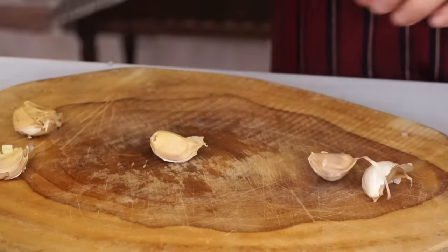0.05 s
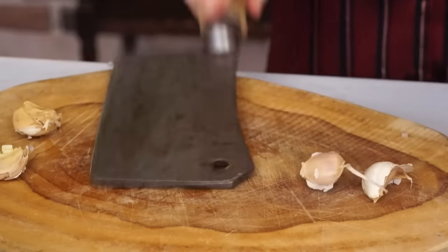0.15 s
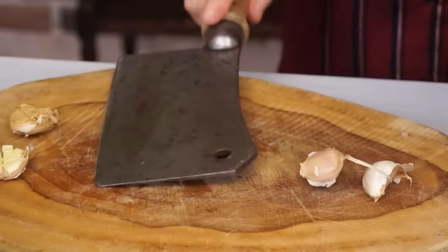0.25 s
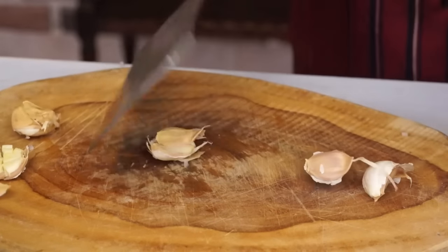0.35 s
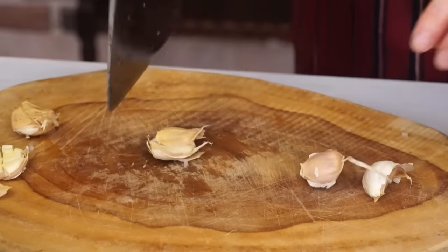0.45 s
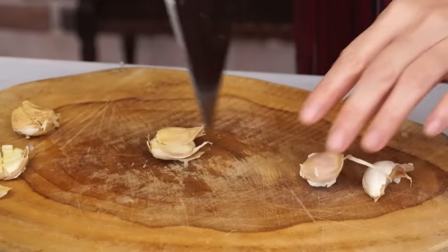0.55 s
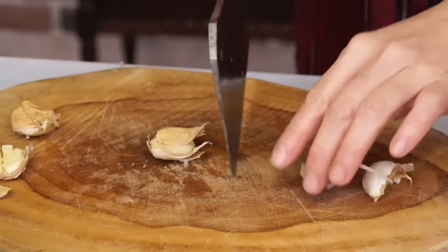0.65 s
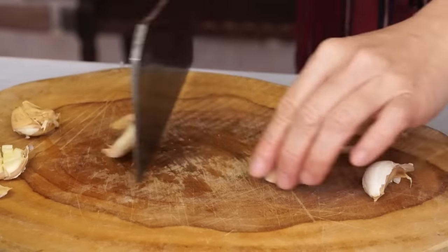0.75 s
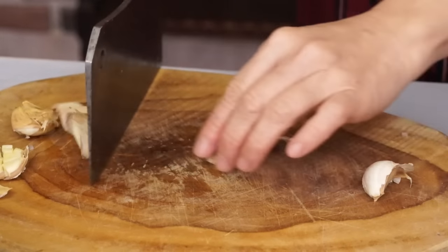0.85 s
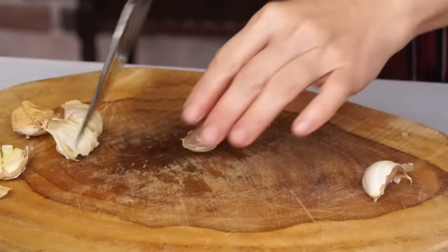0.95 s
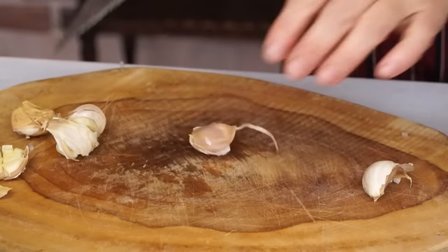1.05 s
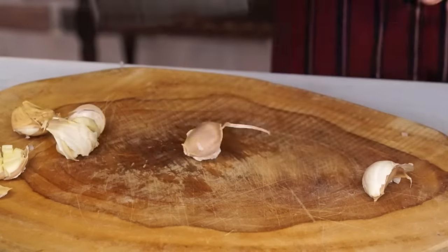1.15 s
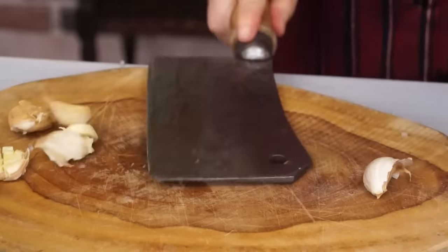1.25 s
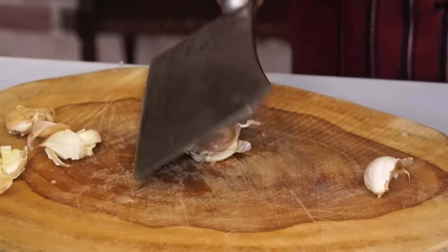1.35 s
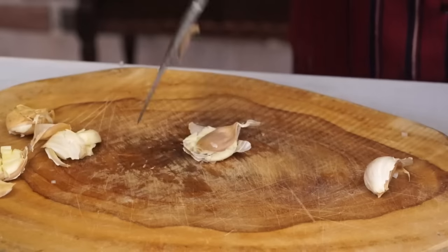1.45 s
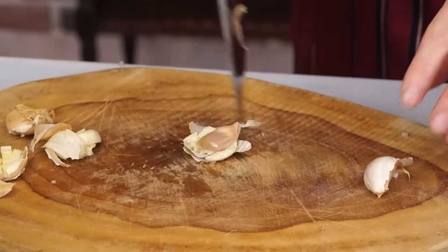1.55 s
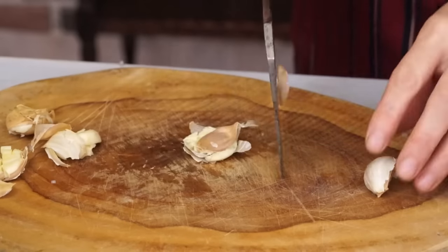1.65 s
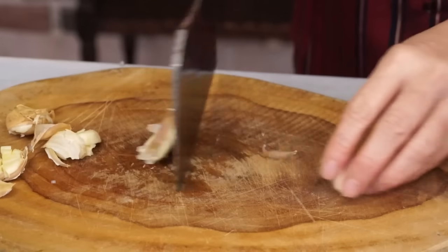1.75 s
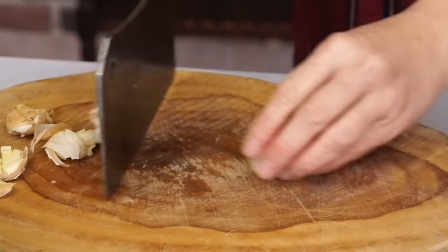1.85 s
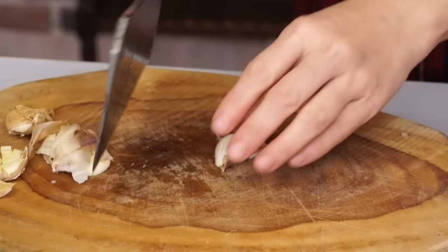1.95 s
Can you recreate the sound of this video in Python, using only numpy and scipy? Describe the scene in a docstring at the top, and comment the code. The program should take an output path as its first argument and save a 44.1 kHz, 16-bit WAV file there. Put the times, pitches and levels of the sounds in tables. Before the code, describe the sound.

A steel cleaver slaps garlic flat on a wooden board twice, close to the microphone in a quiet kitchen. Each blow cracks the clove and rings the blade, then the edge knocks down and scrapes briefly.

```python
"""A steel cleaver slaps a garlic clove flat on a wooden board, twice, close to the microphone.
The clove cracks, the flat lands, and blade, board and counter ring. After each slap the edge is set down
with a knock and scrapes the clove aside, friction making the blade sing faintly. Dry skins tick and the
handle shifts. A live kitchen answers over its own hush, and the camera's limiter holds the slaps down."""
import sys
import numpy as np
from scipy import signal
from scipy.fft import rfft, irfft, next_fast_len
from scipy.io import wavfile
from scipy.ndimage import uniform_filter1d

SR = 44100
rng = np.random.default_rng(int(sys.argv[2]) if len(sys.argv) > 2 else 0)


def unload_audio(sound):
    """Save the sound as a 16-bit wav file, at the path given as the first command line argument."""
    columns = np.transpose(np.atleast_2d(sound))
    # keep every value between -1 and 1, then stretch to whole-number steps
    steps = np.round(np.clip(columns, -1, 1) * 32767)
    wavfile.write(sys.argv[1], SR, steps.astype(np.int16))


N = 90405


def amp(db):
    return 10 ** (np.asarray(db) / 20)


def unit(x):
    return x / np.sqrt(np.mean(x ** 2) + 1e-20)


def along(points, hz):
    """A curve through (frequency, value) points on a log frequency axis."""
    f, v = np.transpose(points)
    return np.interp(np.log(hz + 1), np.log(f + 1), v)


def filtered(x, response):
    """x shaped by a frequency response."""
    size = next_fast_len(x.shape[-1] + 8192)
    return irfft(rfft(x, size) * response(np.fft.rfftfreq(size, 1 / SR)), size)[..., :x.shape[-1]]


def grit(spectrum, size, grains_per_s=20000, spread_db=3):
    """Coloured noise of uneven grains, rms 1."""
    grains = rng.standard_normal(size) * amp(spread_db * rng.standard_normal(size))
    sparse = grains * (rng.random(size) < grains_per_s / SR)
    return unit(filtered(sparse, lambda hz: amp(along(spectrum, hz))))


def stereo(noise, likeness):
    """Two unrelated noises mixed to a left-right likeness by frequency."""
    turn = lambda hz: np.arccos(np.clip(along(likeness, hz), -1, 1)) / 2
    mid, side = filtered(noise, lambda hz: np.array([np.cos(turn(hz)), np.sin(turn(hz))]))
    return np.array([mid + side, mid - side])


def ring(hz, t60, db, t, rise_s):
    """A struck body: a sum of dying modes."""
    hz, t60, db = (np.asarray(v, float)[:, None] for v in (hz, t60, db))
    return (amp(db - 60 * t / t60) * np.sin(2 * np.pi * hz * t)).sum(0) * (1 - np.exp(-t / rise_s))


def click(db, t60, t):
    """A short burst of noise, thin below 2 kHz."""
    thin = filtered(rng.standard_normal(len(t)), lambda hz: 1j * hz / (2000 + 1j * hz))
    return amp(db - 60 * t / t60) * thin


# Room tone: (frequency [Hz], relative density [dB])
HUSH_SPECTRUM = [(15, -41), (25, -8), (270, -15.5), (405, -18.5), (887, -19.5), (1040, -18), (1480, -23),
                 (2000, -23), (2350, -25), (16000, -34)]
# Its width at the microphone: (frequency [Hz], left-right likeness [0-1])
HUSH_LIKENESS = [(60, 0.85), (380, 0.99), (2380, 0.17), (15000, 0.21)]
# Its drift: (time [s], level [dB])
HUSH_LEVEL = [(0, -66.5), (.19, -70.5), (.6, -76), (1.202, -73), (2.05, -73)]


def kitchen_hush():
    """Faint room tone all around the microphone, wider in the treble."""
    noise = filtered(rng.standard_normal((2, N)), lambda hz: amp(along(HUSH_SPECTRUM, hz)))
    level_db = np.interp(np.arange(N) / SR, *np.transpose(HUSH_LEVEL))
    return unit(stereo(noise, HUSH_LIKENESS)) * amp(level_db)


# The kitchen's reverberation: (frequency [Hz], t60 [s])
ROOM_DECAY = [(60, 0.42), (250, 0.44), (1000, 0.47), (4000, 0.37), (10000, 0.3), (16000, 0.31)]
# Its width: (frequency [Hz], left-right likeness [0-1])
ROOM_LIKENESS = [(100, 1), (300, 0.94), (1000, 0.64), (4000, 0.2), (12000, 0.13)]
ROOM_DB, ROOM_GAP_S, BLADE_SEND_DB = -2, 0.0036, -12


def in_kitchen(x, start_s, close=0):
    """x reaches the microphone directly, then off the walls; close is added with no room tail."""
    hz, t, spectra = signal.stft(rng.standard_normal((2, SR * 2 // 3)), SR, nperseg=256)
    decay = amp(-60 * t / along(ROOM_DECAY, hz)[:, None])
    tail = stereo(signal.istft(spectra * decay, SR, nperseg=256)[1], ROOM_LIKENESS)
    tail = np.pad(tail / np.linalg.norm(tail[0]), ((0, 0), (int(ROOM_GAP_S * SR), 0)))
    at_mic = amp(ROOM_DB) * signal.fftconvolve(x[None], tail, axes=1)
    at_mic[:, :len(x)] += x + close
    return np.pad(at_mic, ((0, 0), (round(start_s * SR), N)))[:, :N]


# The handle's modes: (frequency [Hz], t60 [s], relative level [dB])
HANDLE_MODES = [(2510, .04, -4), (2750, .04, -4), (4660, .04, -8), (5120, .05, -9), (6690, .06, 0),
                (7450, .04, -12)]
# Shifts in the grip: (time [s], click level [dB], ring level [dB])
RATTLES = [(0.1273, -50, -53), (0.131, -57.5, -60.5)]


def handle_rattles():
    """The handle shifts in the grip, clicking and ringing briefly."""
    out, t = np.zeros(N + SR), np.arange(SR // 5) / SR
    for s, click_db, ring_db in RATTLES:
        handle = amp(ring_db) * ring(*np.transpose(HANDLE_MODES), t, rise_s=0.00042)
        out[round(s * SR):][:len(t)] += click(click_db, 0.017, t) + handle
    return out[:N]


# Skins on the board: (time [s], rough peak level [dB], t60 [s])
SKIN_TICKS = [(0.7126, -48.5, 0.013), (0.7694, -48.5, 0.015), (0.9644, -56.5, 0.021), (1.085, -59.5, 0.015),
              (1.7629, -43.5, 0.015)]


def skin_ticks(crest_db=6.5):
    """Dry garlic skins give papery clicks."""
    out, t = np.zeros(N + SR), np.arange(SR // 5) / SR
    for s, db, t60 in SKIN_TICKS:
        out[round(s * SR):][:len(t)] += click(db - crest_db, t60, t)
    return out[:N]


# The steel's free modes, also rung by scrapes and slaps: (frequency [Hz], t60 [s])
BLADE_MODES = [(1642, 2), (1870, .5), (2505, .3), (2972, .4), (3558, .28), (4517, .48), (5152, .4),
               (5845, .25), (6371, .4), (6764, .27), (8600, .27), (9230, .25), (10990, .2), (11900, .25)]
# Pings in mid-scrape: (time [s], level [dB], share of the free ring time [0-1])
CATCHES = [(.795, -50.5, .4), (1.857, -50.5, .4)]
# One row a catch: (relative level of each blade mode [dB])
CATCH_MODE_DB = [
    [-32.5, -10.5, 0.5, -20, -19, -5, -20, -18, -12, -27, -24, -20, -24, -26],
    [-3, -16, -1.5, -26, -24, -12, -20, -21, -14, -22, -22, -22, -24, -22],
]


def edge_catches():
    """The edge catches on the wood grain and the blade pings lightly."""
    out, t = 0, np.arange(SR // 3) / SR
    hz, t60 = np.transpose(BLADE_MODES)
    fade = np.clip((t[-1] - t) * 20, 0, 1)
    for (s, db, share), mode_db in zip(CATCHES, CATCH_MODE_DB):
        ping = amp(db) * ring(hz, t60 * share, mode_db, t, rise_s=0.0013)
        out += in_kitchen(ping * fade, s)
    return out


# One list a stroke: (time [s], hiss level [dB], blade drive [dB], wood rumble level [dB])
SCRAPES = [
    [(0.7, -60.5, -72.5, -59), (0.72, -62.5, -85, -62), (0.738, -64.5, -82, -66),
     (0.816, -63, -51.5, -54.5), (0.842, -70, -68.5, -58.5), (0.902, -66, -92, -68),
     (0.932, -79.5, -79, -79), (0.968, -73.5, -93, -84), (0.996, -91.5, -99, -81), (1.02, -94.5, -114, -83)],
    [(1.7, -59.5, -64, -50), (1.736, -73, -60, -48.5), (1.77, -52.5, -70, -59), (1.782, -55, -58, -72),
     (1.806, -53, -52, -77), (1.842, -55.5, -77, -64), (1.852, -49, -81, -63), (1.92, -57.5, -59.5, -72),
     (1.98, -85.5, -73, -82), (2.05, -75.5, -75, -90)],
]
# Friction at the edge: (frequency [Hz], relative density [dB])
HISS_SPECTRUM = [(880, -25), (1500, -11), (1670, -2.5), (2040, -12.5), (2410, -10.5), (3770, -11),
                 (6180, -8.5), (16000, -17.5)]
# Drag in the wood: (frequency [Hz], relative density [dB])
RUMBLE_SPECTRUM = [(47, -33), (80, -5), (390, 0.5), (484, -8.5), (1870, -23.5), (2040, -13), (2500, -13),
                   (3250, -52), (5500, -120)]
# One row a stroke: (relative level of each blade mode [dB])
SCRAPE_MODE_DB = [
    [-16.5, -10, -5, -12, -9, 2.5, -4.5, -16, -4.5, -27, -11, -25, -18, -22],
    [-5.5, -2, -12, -24, -14, -1.5, -8.5, -18, -6, -19.5, -14, -21, -21, -15],
]
SCRAPE_RING_SHARE = [0.48, 0.52]  # of the free ring time, with the edge pressed down


def edge_scrapes():
    """The edge drags over the board: friction hisses, rumbles in the wood and feeds the blade's modes."""
    out, t = 0, np.arange(SR // 2) / SR
    hz, t60 = np.transpose(BLADE_MODES)
    onset = np.minimum(t / 0.0033, 1)
    for stroke, share, mode_db in zip(SCRAPES, SCRAPE_RING_SHARE, SCRAPE_MODE_DB):
        times, hiss_db, drive_db, rumble_db = np.transpose(stroke)
        envelope = lambda db: amp(np.interp(t + times[0], times, db, right=-140)) * onset
        drive = envelope(drive_db) * rng.standard_normal(len(t))
        hiss = envelope(hiss_db) * grit(HISS_SPECTRUM, len(t))
        rumble = envelope(rumble_db) * grit(RUMBLE_SPECTRUM, len(t))
        steel = ring(hz, t60 * share, mode_db, t, rise_s=0.00035)
        song = signal.fftconvolve(drive, steel / np.linalg.norm(steel))[:len(t)]
        out += in_kitchen(hiss + rumble + amp(BLADE_SEND_DB) * song, times[0], close=song)
    return out


# Board on the counter: (frequency [Hz], t60 [s], gain under a slap [dB], gain under a knock [dB])
BOARD_MODES = [(95, 0.19, -15.5, -38.5), (142.4, 0.11, -2, -2.5), (278, 0.052, -3.5, -3.5),
               (368.7, 0.11, -0.5, -7.5), (462, 0.066, -4.5, -8), (621.7, 0.052, -1.5, -4),
               (797.4, 0.026, 6, 9.5), (938.4, 0.027, 0, 8), (1034.3, 0.013, -1.5, 17),
               (1269, 0.039, -5, 0.5), (1864, 0.026, -1.5, 0), (2220, 0.0066, 1, 14)]
# Edge set down: (time [s], board [dB], dull smack [dB], contact cut-off [Hz], click [dB], handle [dB])
KNOCKS = [(0.6866, -24.5, -28.5, 1667, -43.5, -43), (1.6798, -18, -23.5, 2780, -60, -61)]


def edge_knocks():
    """The edge meets the wood: a dull board ring, a crisp click and a shake of the handle."""
    out, t = 0, np.arange(SR // 2) / SR
    hz, t60, _, mode_db = np.transpose(BOARD_MODES)
    for s, board_db, smack_db, cutoff_hz, click_db, handle_db in KNOCKS:
        wood = ring(hz, t60, mode_db + board_db, t, rise_s=0.0029)
        smack = amp(smack_db - 60 * t / 0.038) * rng.standard_normal(len(t))
        dull = filtered(wood + smack, lambda f: 1 / (1 + 1j * f / cutoff_hz) ** 2)
        handle = amp(handle_db) * ring(*np.transpose(HANDLE_MODES), t, rise_s=0.004)
        out += in_kitchen(dull + click(click_db, 0.024, t) + handle, s)
    return out


# One row a slap: (relative level of each blade mode [dB])
SLAP_MODE_DB = [
    [-40, -12, -14, -22.5, -8, -1, -15.5, -34, 0.0087, -17, -24.5, -31, -15, -24.5],
    [-42, -9, -18, -11.5, -20, -20, -21, -23, 0, -26.5, -9.5, -30.5, -12.5, -33.5],
]
SLAP_RING_SHARE = [0.77, 0.75]  # of the free ring time, with the flat lying on the clove
CHOKE_AT_S, CHOKE_DB, CHOKE_S, CHOKE_ABOVE_HZ = [0.34, 1.342], [4, 14], 0.02, 5500


def slapped_blade(k, since_landing, scene_time):
    """The steel rings after slap k, all but its lowest mode damped by the clove; the treble soon drops."""
    hz, free_t60 = np.transpose(BLADE_MODES)
    t60 = free_t60 * np.where(hz < 1700, 1, SLAP_RING_SHARE[k])
    modes = np.array([hz, t60, SLAP_MODE_DB[k]])
    low = ring(*modes[:, hz < CHOKE_ABOVE_HZ], since_landing, rise_s=0.0011)
    high = ring(*modes[:, hz >= CHOKE_ABOVE_HZ], since_landing, rise_s=0.0011)
    choke = amp(-CHOKE_DB[k] * np.clip((scene_time - CHOKE_AT_S[k]) / CHOKE_S, 0, 1))
    return low + choke * high


# One row a slap: (level shift of each board mode [dB])
BOARD_SHIFT_DB = [
    [0, 1, -0.5, 0.5, 0, -3.5, -0.5, -3, 0.003, 0.0026, 0, 0],
    [0, 2, 3, -4.5, 1.4, 1.5, 2, 0, 0.0057, 0.0082, 0, 0],
]
PRESS_RISE_S, PRESS_T60 = [0.0077, 0.035], [0.083, 0.092]


def slapped_board(k, t, since_landing, bass_db):
    """The rough push of slap k drives the board's modes."""
    hz, t60, mode_db, _ = np.transpose(BOARD_MODES)
    envelope = (1 - np.exp(-since_landing / PRESS_RISE_S[k])) * amp(-60 * since_landing / PRESS_T60[k])
    press = envelope * rng.standard_normal(len(t))
    wood = ring(hz, t60, mode_db + BOARD_SHIFT_DB[k] + bass_db * (hz < 200), t, rise_s=0.003)
    return signal.fftconvolve(press / np.linalg.norm(press), wood)[:len(t)]


# The two blows: (crack time [s], landing time [s], crush [dB], board [dB], counter [dB], blade [dB],
# shift of the board's bass [dB])
SLAPS = [(.2095, .2143, -14.5, -18, -59.5, -29.5, -4), (1.2395, 1.2432, -6, -13.5, -55.5, -19.5, -7)]
# The clove giving way, one list a slap: (frequency [Hz], relative density [dB])
CRUSH_SPECTRA = [
    [(180, -41), (300, -8), (1560, -6), (1900, -5), (3190, -9.5), (3580, -8), (5520, -12.5), (11300, -15),
     (16000, -31)],
    [(180, -41.5), (300, -13.5), (1870, -5), (2170, -9.5), (2980, -3), (5800, -12.5), (6200, -8),
     (8500, -11), (16000, -23.5)],
]
CRUSH_RISE_S, CRUSH_T60, LANDING_DB, LANDING_T60 = 0.003, 0.047, -3, 0.0091
COUNTER_HZ, COUNTER_T60 = [34, 47], [1.2, 1.0]


def cleaver_slaps():
    """Close to the microphone the clove cracks, then the flat lands: blade, board and counter ring."""
    out, t = 0, np.arange(SR * 3 // 5) / SR
    fade = np.clip((t[-1] - t) * 10, 0, 1)
    for k, (crack_s, land_s, crush_db, board_db, counter_db, blade_db, bass_db) in enumerate(SLAPS):
        since_landing = np.maximum(t - (land_s - crack_s), 0)
        crack = (1 - np.exp(-t / CRUSH_RISE_S)) * amp(-60 * t / CRUSH_T60)
        landing = (since_landing > 0) * amp(LANDING_DB - 60 * since_landing / LANDING_T60)
        crush = amp(crush_db) * (crack + landing) * grit(CRUSH_SPECTRA[k], len(t))
        wood = amp(board_db) * slapped_board(k, t, since_landing, bass_db)
        steel = amp(blade_db) * slapped_blade(k, since_landing, t + crack_s)
        counter = ring(COUNTER_HZ, COUNTER_T60, [counter_db] * 2, since_landing, rise_s=0.06)
        into_room = crush + wood + amp(BLADE_SEND_DB) * steel
        out += in_kitchen(into_room, crack_s, close=(steel + counter) * fade)
    return out


# The board's place in the stereo image: (frequency [Hz], left over right [dB])
BALANCE = [(100, 0), (2000, 0.5), (8000, -2.5), (15000, -8)]


def scene():
    """From the microphone, the work on the board leans a little right in the treble, over room tone."""
    work = cleaver_slaps() + edge_knocks() + edge_scrapes()
    work += in_kitchen(skin_ticks() + handle_rattles(), 0) + edge_catches()
    placed = filtered(work, lambda hz: amp(along(BALANCE, hz) * np.array([[0.5], [-0.5]])))
    return placed + kitchen_hush()


LIMIT_DB, DETECTOR_S, RELEASE_DB_PER_S = -22, 0.004, 499.5
CEILING, TOP_HZ = 0.32, 15900


def record(dry):
    """The camera's limiter ducks at once and lets go steadily; peaks round off and the top is cut."""
    power = np.abs(uniform_filter1d((dry ** 2).mean(0), int(DETECTOR_S * SR)))
    over_db = np.maximum(10 * np.log10(power + 1e-12) - LIMIT_DB, 0)
    release = RELEASE_DB_PER_S * np.arange(N) / SR
    duck_db = np.maximum.accumulate(over_db + release) - release
    held = dry * amp(-uniform_filter1d(duck_db, size=45))
    rounded = held / (1 + (held / CEILING) ** 4) ** (1 / 4)
    return filtered(rounded, lambda hz: hz < TOP_HZ)


dry = scene()
out = record(dry)
unload_audio(out)
```